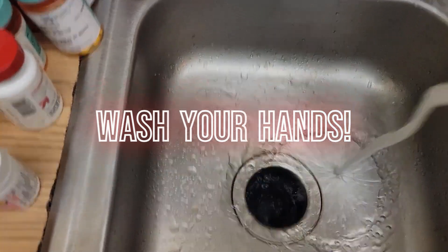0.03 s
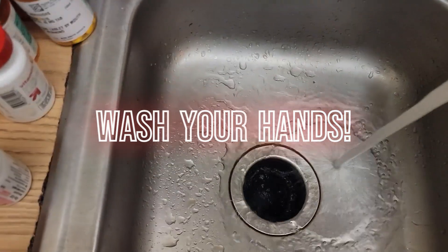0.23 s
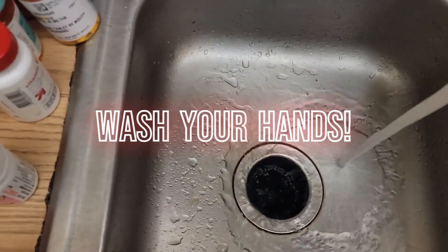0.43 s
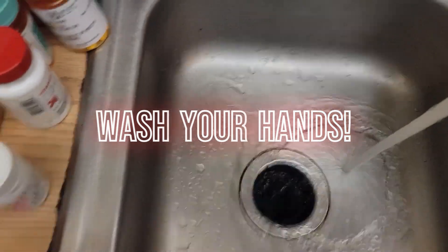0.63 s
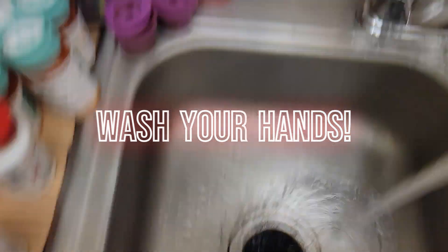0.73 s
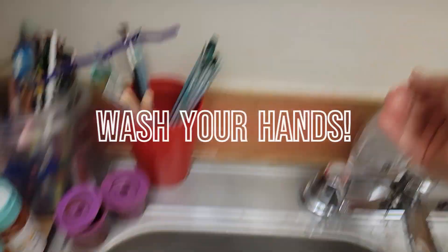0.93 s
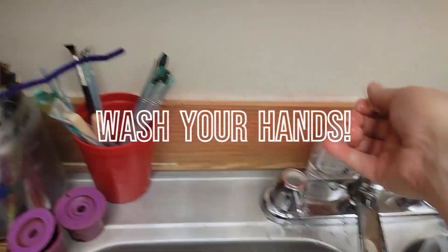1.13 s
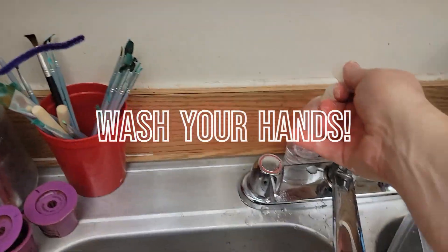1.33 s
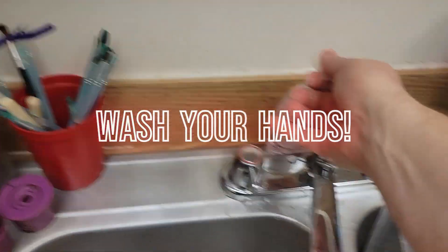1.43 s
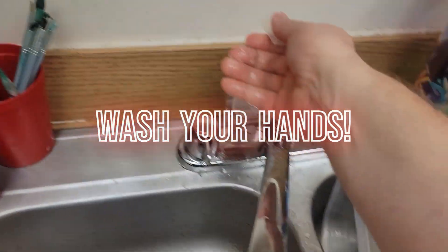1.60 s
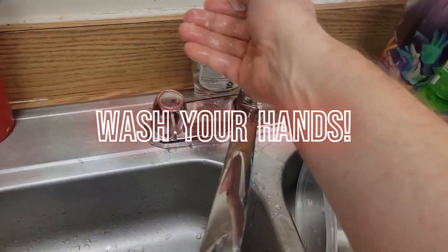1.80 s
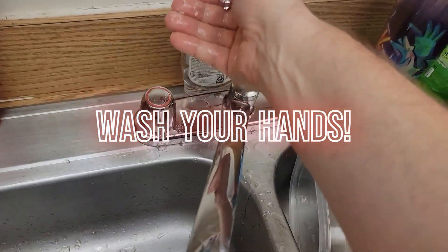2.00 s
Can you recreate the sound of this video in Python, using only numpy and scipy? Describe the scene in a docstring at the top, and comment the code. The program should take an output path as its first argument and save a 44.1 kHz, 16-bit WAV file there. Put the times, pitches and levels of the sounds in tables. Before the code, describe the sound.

A running kitchen tap hisses and spatters in a metal sink, with faint handling bumps.

```python
"""Tap running into a steel sink

A kitchen tap runs, heard from a hand-held microphone that tilts from the basin up to the tap.
The airy jet hisses and spatters, and its flow keeps narrow, fluttering tones ringing.
Soft thumps and a few hollow knocks come as the microphone is handled and a hand reaches behind the tap."""
import sys
import numpy as np
from scipy import signal
from scipy.fft import rfft, irfft
from scipy.io import wavfile
from scipy.ndimage import uniform_filter1d

SR = 44100
rng = np.random.default_rng(int(sys.argv[2]) if len(sys.argv) > 2 else 0)


def output_pcm(signal):
    """Save a mono or channel-first signal as 16-bit PCM at the path in sys.argv[1].

    Samples are clipped to [-1, 1] before scaling.
    """
    pcm = np.clip(np.atleast_2d(signal).T, -1, 1) * 32767
    wavfile.write(sys.argv[1], SR, np.round(pcm).astype(np.int16))


N = 90669
T, HZ = np.arange(N) / SR, np.fft.rfftfreq(N, 1 / SR)

TILT_START_S, TILT_END_S = 0.76, 0.9  # the microphone turns from the basin to the tap
REACH_START_S, REACH_END_S = 1.1, 1.67  # then it moves close to the spout
WHISTLE_HZ, LOW_EDGE_HZ, HIGH_EDGE_HZ = 4045, 1800, 4300
DROPS_PER_S, DROP_SPREAD_DB, DROP_SHARE = 4000, 2.5, 0.29
RING_FLUTTER_DB, RING_SWELL_DB, RING_LIKENESS = 1.5, 0.5, 0.73
RIPPLE_DB, RIPPLE_WIDTH_HZ, RIPPLE_S, RIPPLE_FULL_HZ = 2.5, 20, 0.35, 1900
PATCH_DB, SURGE_DB, KNOCK_RISE_S = 1.74, 0.19, 0.012

# Handling bumps. Each row: start in seconds, thump in dB, scuff in dB, rise and decay in seconds.
BUMP_EVENTS = [(0, -34, -33, 0.0018, 0.036), (0.019, -35, -37.5, 0.003, 0.064),
               (0.092, -34.5, -38, .005, .02), (.15, -42, -50, 0.012, 0.034),
               (0.21, -28, -26, 0.0022, 0.027), (0.257, -33.5, -36, 0.0072, 0.055),
               (0.303, -34, -34.5, 0.0034, 0.022), (0.356, -33, -55, 0.0037, .013),
               (.41, -41, -53, .006, 0.011), (0.802, -39, -54, 0.0055, 0.013),
               (1.137, -47, -32.5, .004, 0.012), (1.162, -39, -50, 0.0084, 0.028),
               (1.321, -36.5, -48, 0.0083, 0.023), (1.348, -34, -58, 0.0065, 0.024),
               (1.55, -41, -61, 0.0066, 0.0083), (1.995, -39, -57, 0.017, 0.011)]
# The two parts of a bump. Each row: pitch in Hz, width in Hz, level in dB.
THUMP_TONES = [(85, 13, -11), (140.4, 30, 0), (173, 34, -8)]
SCUFF_TONES = [(310, 230, 1), (453, 64, -3), (547, 240, -11.5)]
# Hollow knocks. Each row: start in seconds, level in dB, pitch in Hz.
KNOCK_EVENTS = [(0.21, -28.5, 364), (1.136, -19.5, 447), (1.94, -26.5, 500)]
# The tones in a knock. Each row: pitch ratio, level in dB, seconds to fade by 60 dB.
KNOCK_TONES = [(.5, -13, 0.048), (.76, -5.5, 0.052), (0.998, 1, 0.085), (1.17, -7.5, 0.052)]
# Ringing tones of tap and basin. Each row: pitch in Hz, width in Hz, level in dB facing the basin,
# facing the tap and near the spout, then left over right in dB.
RING_TONES = [(592, 18, -62, -57, -57, 0), (960, 100, -47, -46, -46, 0), (1290, 60, -41, -39, -37, 3),
              (1385, 80, -39, -31.5, -29.5, 4), (1620, 80, -39, -38, -37, 6), (2005, 80, -44, -32, -34, 3),
              (2080, 70, -31, -37, -33, 6), (2478, 50, -42, -42, -41, 7), (2745, 60, -46, -40, -42, 7),
              (2960, 70, -44, -48, -44, 2), (3235, 70, -41, -45, -43, 5), (3730, 80, -43, -44, -46, -4),
              (WHISTLE_HZ, 60, -36, -36, -37, -3), (4610, 120, -41, -39, -41, -3),
              (4965, 70, -45, -39, -40, -1), (5350, 60, -42, -36, -46, 4), (5550, 110, -46, -37, -34, 2),
              (6230, 110, -39, -34.5, -33, 3), (6620, 60, -47, -42, -36.5, 4), (6980, 75, -45, -36, -36, 1),
              (7235, 55, -38, -41, -38, 3), (7840, 130, -42, -42, -42, -3), (8560, 140, -46, -44, -45, -2)]
# How the low, middle and high tones and a thin whistle swell. Each row: time in seconds, change in dB.
LOW_SWELL = [(0, 2.5), (.45, 2.5), (.8, 1), (.87, -0.5), (1.15, 0.5), (1.33, 2), (1.6, 0), (1.85, 1),
             (2.05, -1.5)]
MIDDLE_SWELL = [(0, -2), (.15, -5), (.32, 1.5), (.39, 2.5), (.55, 2.5), (.72, -1), (.9, 4), (1.07, 0),
                (1.35, 2), (1.7, 2.5), (1.9, 1), (2.05, 3.5)]
HIGH_SWELL = [(0, 0.61), (.11, 0.21), (.2, -2.9), (.45, -0.24), (.7, 1.7), (.92, 1.8), (1.15, 2.6),
              (1.35, -1), (1.55, 3), (1.72, 0.32), (1.88, -2.1), (2.05, 0.19)]
WHISTLE_SWELL = [(0, -4), (.17, -7), (.29, 1), (.38, -1), (.47, -1), (.56, -2), (.63, 4), (.8, -2),
                 (1.02, 4), (1.1, -5.5), (1.2, 2), (1.36, -1), (1.8, 2.5), (2.05, 0)]
# How far a tone's left side leads. Each row: pitch in Hz, radians facing the basin, then the tap.
LEFT_LEAD = [(590, -1.7, -0.5), (890, 1.5, 1.5), (1405, -2.5, 0.52), (1510, 1.5, 1.8), (2120, -1.57, -2.1),
             (2730, -2.5, -2), (4000, -1.1, -0.15), (4140, 1.8, 3.5), (4350, 2, 4), (5560, 2.9, 0.8),
             (6450, 5, 1.5), (7200, 2.5, 0.66), (7800, .5, 1.5)]
# The spray's hiss. Each row: frequency in Hz, dB per Hz facing the basin, then the tap.
SPRAY_HISS = [(20, -78, -87), (60, -85, -78.5), (158, -71.5, -75.5), (240, -86, -87.5), (398, -74.5, -76.5),
              (730, -80.5, -78), (1150, -82, -98), (1310, -66.5, -63.5), (2200, -70, -67.5),
              (3480, -67, -65.5), (4440, -66.5, -62), (6140, -64, -61.5), (7700, -65.5, -65),
              (8120, -73, -70), (8860, -70, -67), (9730, -68.5, -66.5), (10400, -67, -67.5),
              (10900, -68.5, -67.5), (11750, -66.5, -65.5), (12550, -66, -60.5), (13400, -65.5, -64),
              (14300, -64.5, -61.5), (15100, -67, -63), (16000, -66, -65)]
# Where the hiss sits. Each row: frequency in Hz, left over right in dB facing the basin, then the tap.
SPRAY_BALANCE = [(375, 0, 0), (740, -11, -2), (1450, -6, 7), (2630, 6, -0.5), (4140, -1.5, 1), (6200, 1, 3),
                 (8500, -3.5, 0.5), (10300, -3.5, -2.5), (11800, 3, 10.5), (13500, 4, 3.5), (15900, 4, 16)]
# How alike left and right are. Each row: frequency in Hz, likeness from 0 to 1.
STEREO_LIKENESS = [(100, .99), (420, 0.67), (750, 0.83), (1300, 0), (2000, 0.0055), (4000, 0), (16000, 0)]
# How the hiss swells. Each row: time in seconds, change in dB.
SPRAY_SWELL = [(0, 2), (.1, 2), (.2, 1.5), (.55, 0.8), (.72, 1), (1.0, -2.5), (1.3, -0.55), (1.6, -1.2),
               (1.8, -1), (2.05, 0)]


def amp(db):
    """Turns decibels into a gain."""
    return 10 ** (np.asarray(db) / 20)


def unit(x):
    """Scales a signal to an average power of 1."""
    return x / np.sqrt(np.mean(x ** 2) + 1e-20)


def spectrum(table, column=1):
    """Spreads one column of a table over all frequencies."""
    rows = np.array(table)
    return np.interp(np.log(HZ + 1), np.log(rows[:, 0]), rows[:, column])


def curve(points):
    """Joins points in time with straight lines."""
    return np.interp(T, *np.transpose(points))


def colour(x, gain):
    """Filters a signal with a gain for each frequency."""
    return irfft(rfft(x) * gain, N)


def peak(hz, width, order=3):
    """A filter that passes a narrow band around one pitch."""
    half = width / 2 / np.sqrt(2 ** (1 / order) - 1)
    return 1 / (1 + 1j * (HZ - hz) / half) ** order


def wander(rate_hz):
    """Random drifting, up to about the given rate."""
    slow_band = HZ / (HZ + 3) / np.sqrt(HZ + 6) / (1 + (HZ / rate_hz) ** 4)
    return unit(colour(rng.standard_normal(N), slow_band))


def pan(db):
    """Left and right gains that keep the total power the same."""
    gains = amp(np.array([db, -db]).reshape(2, -1) / 2)
    return gains / np.sqrt(np.mean(gains ** 2, axis=0))


def tilt():
    """0 while facing the basin, 1 when facing the tap."""
    return curve([(TILT_START_S, 0), (TILT_END_S, 1)])


def bumps():
    """Each handling bump is a short rough push: a deep thump with a scuff above it."""
    bodies = [sum(amp(db) * abs(peak(hz, width)) for hz, width, db in tones)
              for tones in (THUMP_TONES, SCUFF_TONES)]
    out = np.zeros(N)
    for start, thump_db, scuff_db, rise, decay in BUMP_EVENTS:
        age = np.maximum(T - start, 0)
        push = np.minimum(age / rise, 1) * np.exp(-np.maximum(age - rise, 0) / decay)
        for body, db in zip(bodies, (thump_db, scuff_db)):
            burst = unit(push * colour(rng.standard_normal(N), body))
            out += amp(db) * burst * np.sqrt(np.mean(push ** 2))
    return out


def grip_rumble():
    """A low rumble that dies away as the grip settles."""
    rumble = unit(colour(rng.standard_normal(N), peak(hz=74.5, width=30)))
    return amp(-32) * rumble * np.exp(-T / 0.11)


def knocks():
    """Light knocks on something hollow, each a few quickly fading tones."""
    out = np.zeros(N)
    for start, db, hz in KNOCK_EVENTS:
        age = np.maximum(T - start, 0)
        rise = np.minimum(age / KNOCK_RISE_S, 1)
        for ratio, tone_db, fade_s in KNOCK_TONES:
            out += rise * amp(db + tone_db - 60 * age / fade_s) * np.sin(2 * np.pi * hz * ratio * age)
    return out


def spatter():
    """Many drops of uneven size land over the even rush of the jet."""
    size = amp(DROP_SPREAD_DB * np.minimum(rng.exponential(1, (2, N)), 5))
    sign = rng.choice([-1, 1], (2, N))
    drops = size * sign * (rng.random((2, N)) < DROPS_PER_S / SR)
    rush = rng.standard_normal((2, N))
    return np.sqrt(DROP_SHARE) * unit(drops) + np.sqrt(1 - DROP_SHARE) * rush


def rings():
    """The flow keeps tap and basin ringing, each tone with its own flutter and swell."""
    shared, separate = rfft(spatter())
    flow = np.array([shared, RING_LIKENESS * shared + np.sqrt(1 - RING_LIKENESS ** 2) * separate])
    lead_hz, basin_lead, tap_lead = np.transpose(LEFT_LEAD)
    turned, out = tilt(), np.zeros((2, N))
    for hz, width, basin_db, tap_db, spout_db, side_db in RING_TONES:
        swell = LOW_SWELL if hz < LOW_EDGE_HZ else MIDDLE_SWELL if hz < HIGH_EDGE_HZ else HIGH_SWELL
        if hz == WHISTLE_HZ:
            swell = WHISTLE_SWELL
        left, right = np.fft.ifft(flow * peak(hz, width), N)
        lead = (1 - turned) * np.interp(hz, lead_hz, basin_lead)
        lead += turned * np.interp(hz, lead_hz, tap_lead)
        ring = np.array([left, right * np.exp(-1j * lead)]).real
        waver_db = RING_FLUTTER_DB * wander(rate_hz=69) + RING_SWELL_DB * wander(rate_hz=3.2)
        place_db = curve([(TILT_START_S, basin_db), (TILT_END_S, tap_db),
                          (REACH_START_S, tap_db), (REACH_END_S, spout_db)])
        out += unit(ring * amp(waver_db)) * pan(side_db) * amp(place_db + curve(swell))
    return out


def shifting_splash(x):
    """Separate bands swell briefly as the splash shifts about."""
    bands = signal.stft(x, nperseg=256, noverlap=192)[2]
    patches = uniform_filter1d(rng.standard_normal(bands.shape[1:]), size=5, axis=0)  # smooth in pitch
    patches = unit(uniform_filter1d(patches, size=16, axis=1))  # and in time
    return unit(signal.istft(bands * amp(PATCH_DB * patches), nperseg=256, noverlap=192)[1][:, :N])


def standing_waves(x):
    """Sound waves in the basin make narrow peaks and dips that drift as the microphone moves."""
    hz, t, bands = signal.stft(x, SR, nperseg=2048, noverlap=1536)
    time_blur = np.exp(-.5 * ((t[:, None] - t) / RIPPLE_S) ** 2)
    pitch_blur = np.exp(-.5 * ((hz[:25] - hz[12]) / RIPPLE_WIDTH_HZ) ** 2)
    ripple = rng.standard_normal(bands.shape) @ (time_blur / np.linalg.norm(time_blur, axis=0))
    ripple = unit(signal.fftconvolve(ripple, pitch_blur[None, :, None], "same", axes=1))
    depth_db = RIPPLE_DB * np.minimum(hz / RIPPLE_FULL_HZ, 1)[:, None]
    return unit(signal.istft(bands * amp(depth_db * ripple), nperseg=2048, noverlap=1536)[1][:, :N])


def stereo_pair(x):
    """Mixes two unrelated signals into left and right, alike in the bass."""
    angle = np.arccos(spectrum(STEREO_LIKENESS)) / 2
    mid, side = colour(x[0], np.cos(angle)), colour(x[1], np.sin(angle))
    return np.array([mid + side, mid - side])


def spray():
    """The jet breaks on the steel; its hiss changes tone and side as the microphone turns."""
    splash = standing_waves(shifting_splash(spatter()))
    hiss = stereo_pair(splash) * np.sqrt(SR / 2)  # a power of 1 per Hz
    basin = colour(hiss, amp(spectrum(SPRAY_HISS, 1)) * pan(spectrum(SPRAY_BALANCE, 1)))
    tap = colour(hiss, amp(spectrum(SPRAY_HISS, 2)) * pan(spectrum(SPRAY_BALANCE, 2)))
    return (basin + tilt() * (tap - basin)) * amp(curve(SPRAY_SWELL))


def scene():
    """Spray and ringing surge together; the handling sounds sit near the middle."""
    water = (spray() + rings()) * amp(SURGE_DB * wander(rate_hz=60))
    handling = bumps() + grip_rumble() + knocks()
    return water + handling * pan(db=-1.5)


def record(dry):
    """Cuts away the very highest treble."""
    low_pass = signal.firwin(511, cutoff=15800, window=("kaiser", 9), fs=SR)
    return signal.oaconvolve(dry, low_pass[None], "same")


dry = scene()
out = record(dry)
output_pcm(out)
```